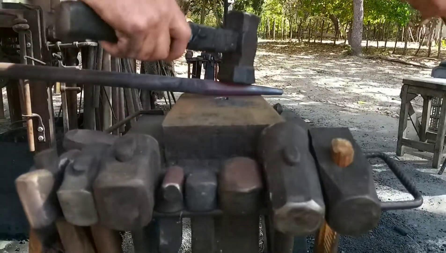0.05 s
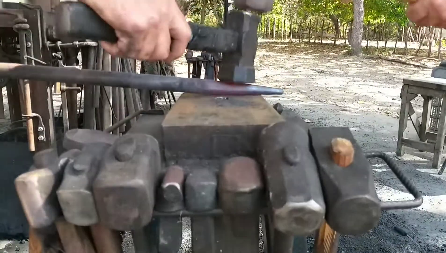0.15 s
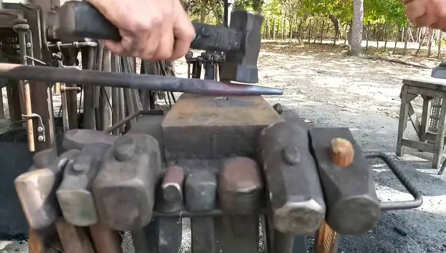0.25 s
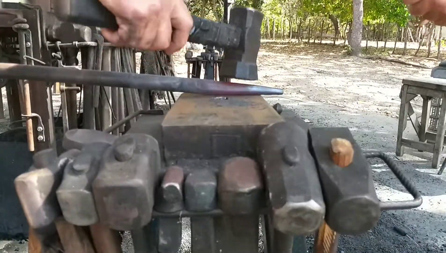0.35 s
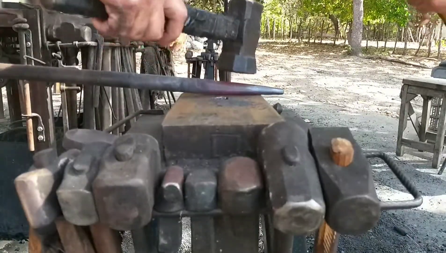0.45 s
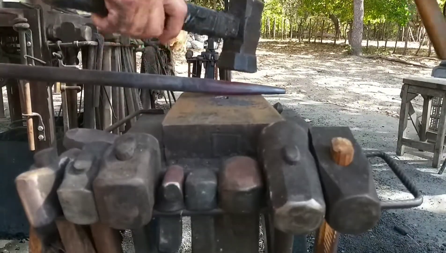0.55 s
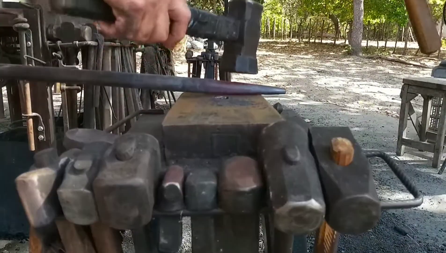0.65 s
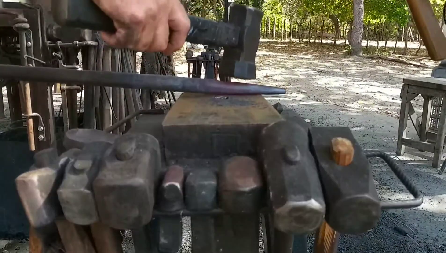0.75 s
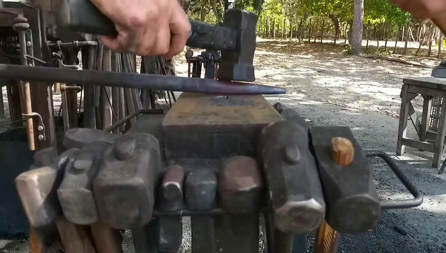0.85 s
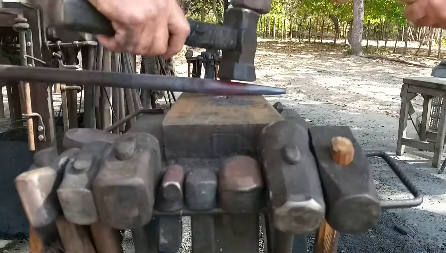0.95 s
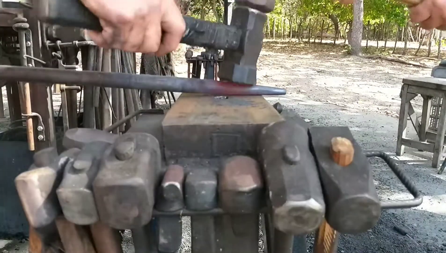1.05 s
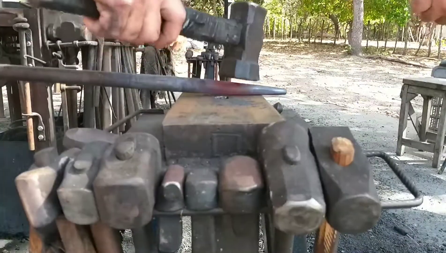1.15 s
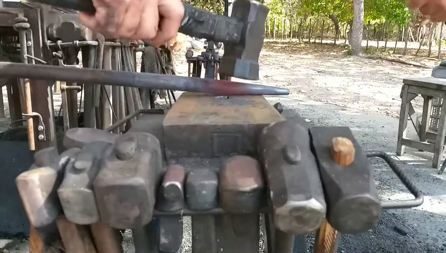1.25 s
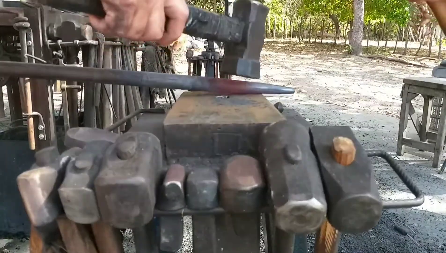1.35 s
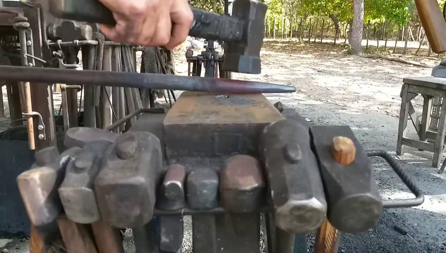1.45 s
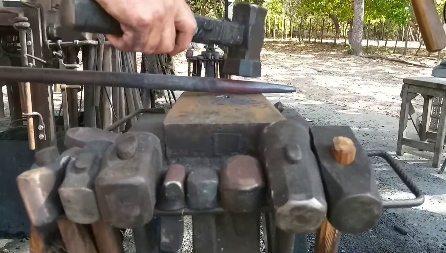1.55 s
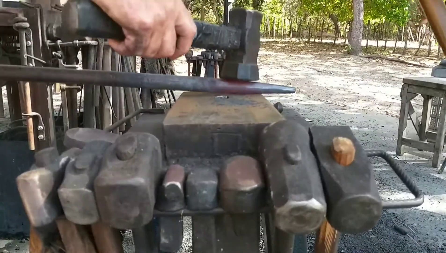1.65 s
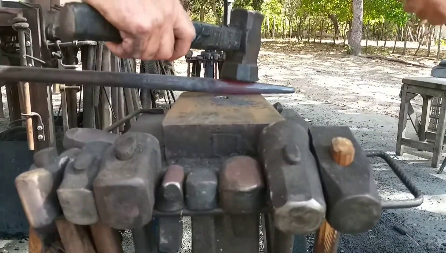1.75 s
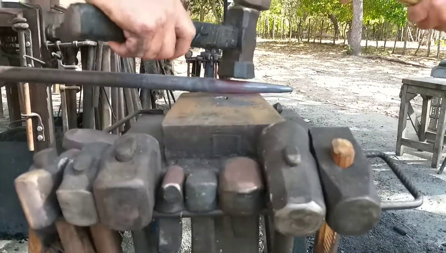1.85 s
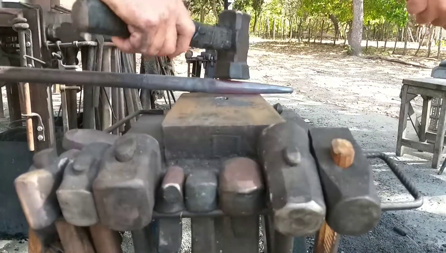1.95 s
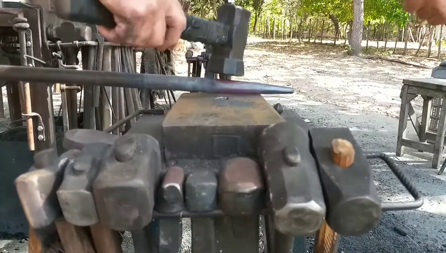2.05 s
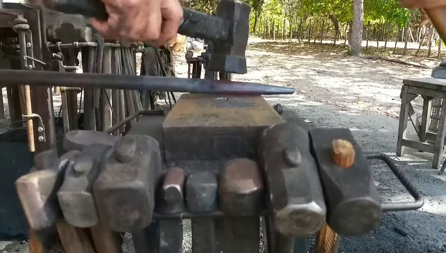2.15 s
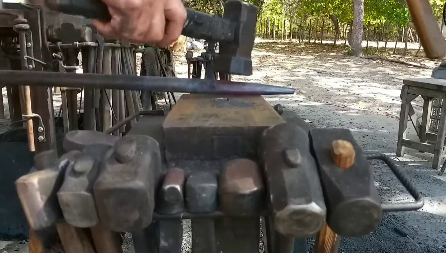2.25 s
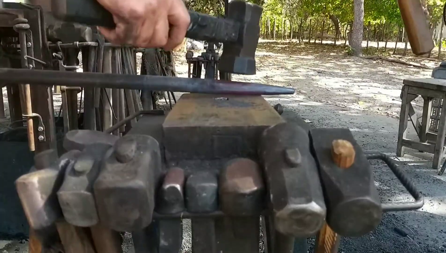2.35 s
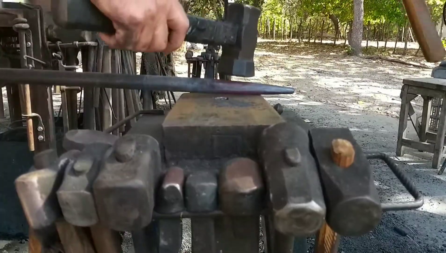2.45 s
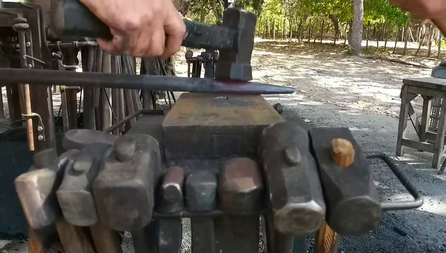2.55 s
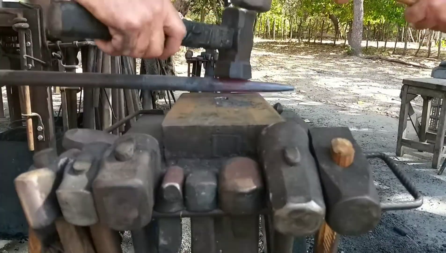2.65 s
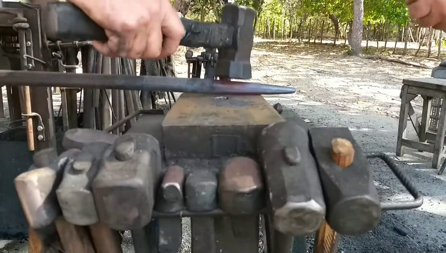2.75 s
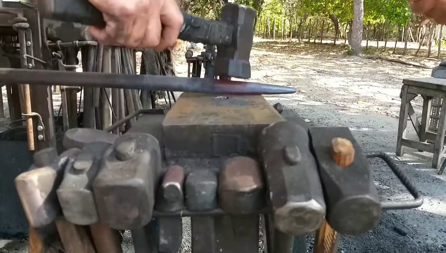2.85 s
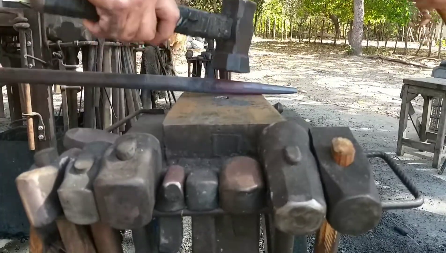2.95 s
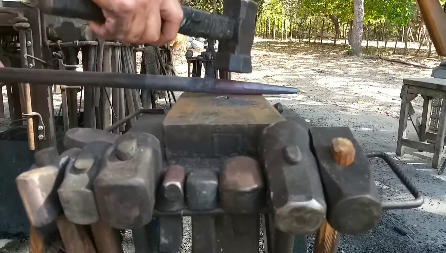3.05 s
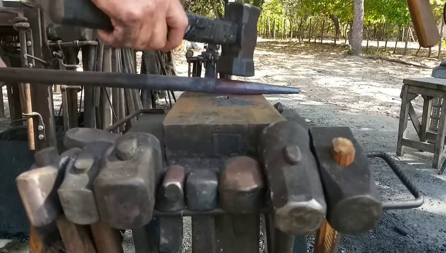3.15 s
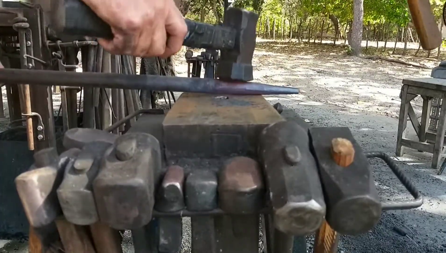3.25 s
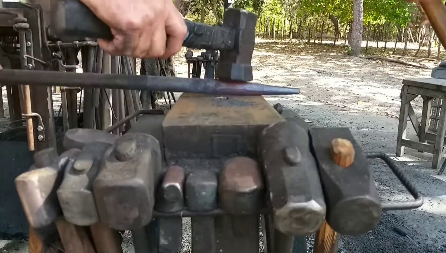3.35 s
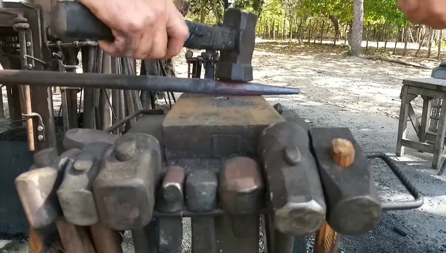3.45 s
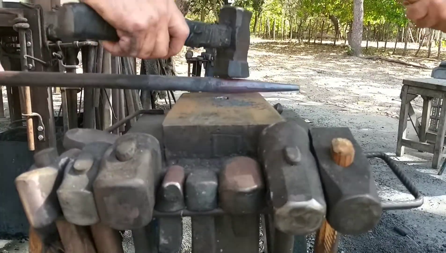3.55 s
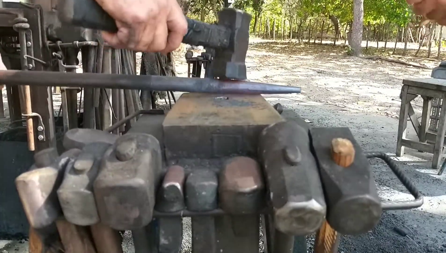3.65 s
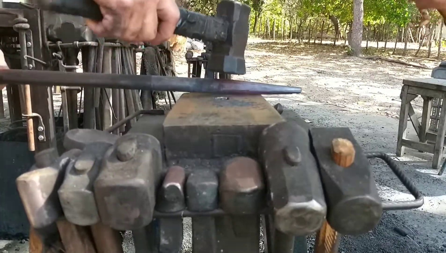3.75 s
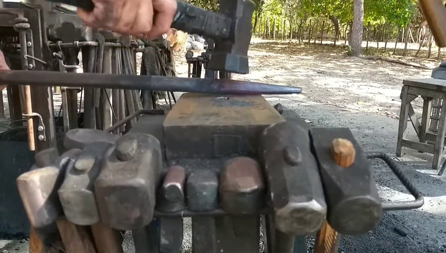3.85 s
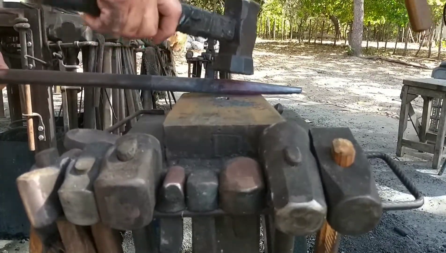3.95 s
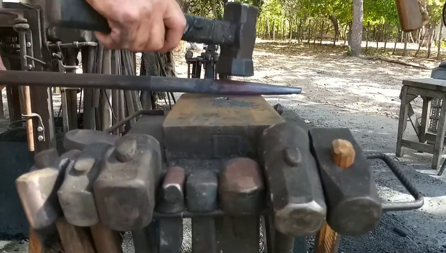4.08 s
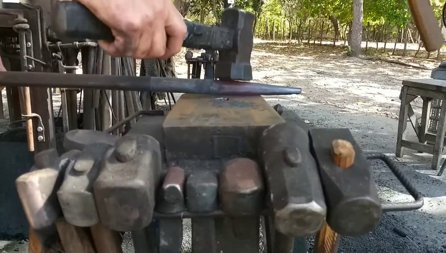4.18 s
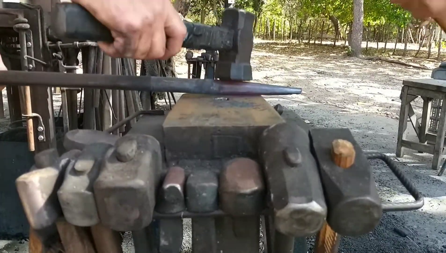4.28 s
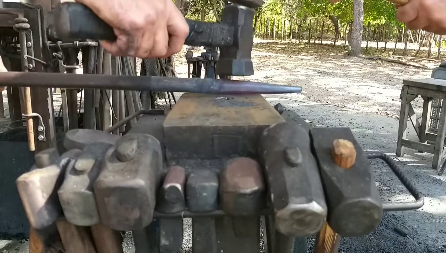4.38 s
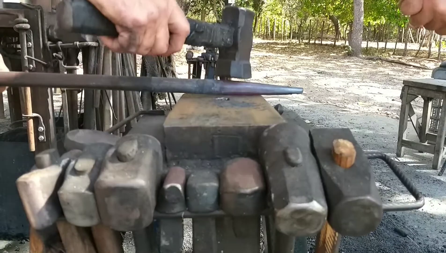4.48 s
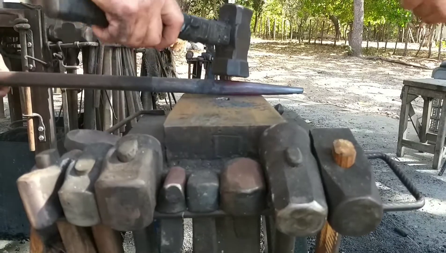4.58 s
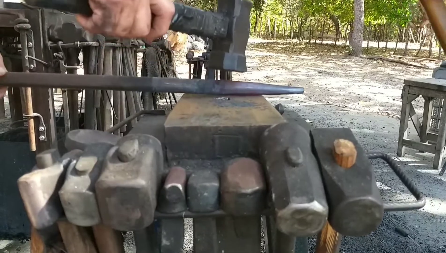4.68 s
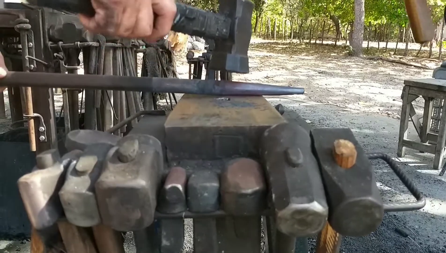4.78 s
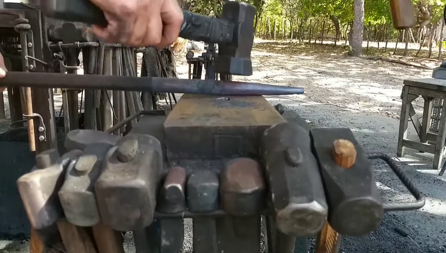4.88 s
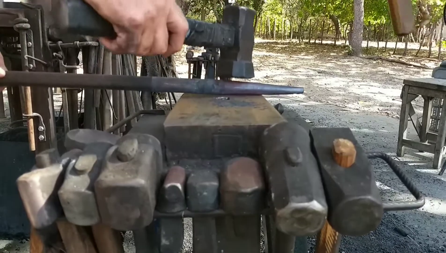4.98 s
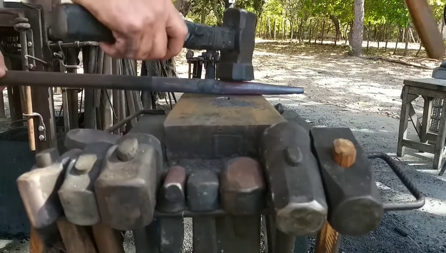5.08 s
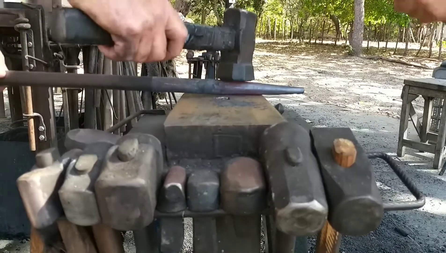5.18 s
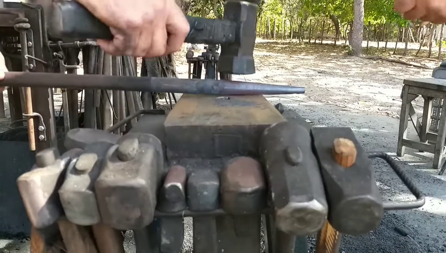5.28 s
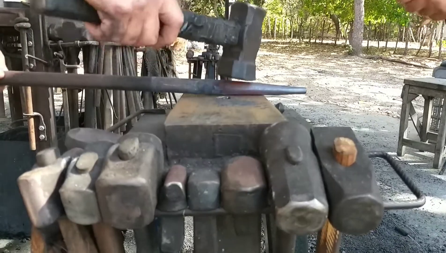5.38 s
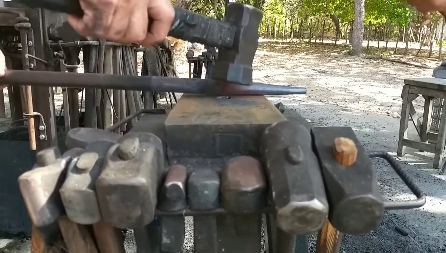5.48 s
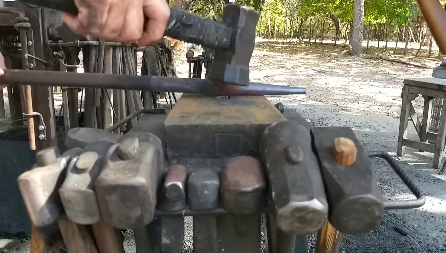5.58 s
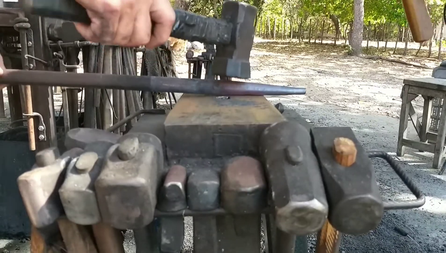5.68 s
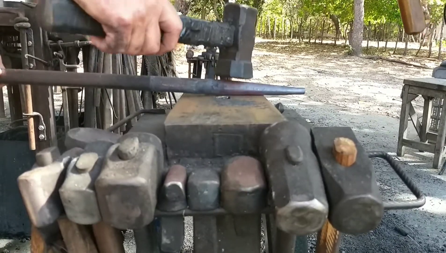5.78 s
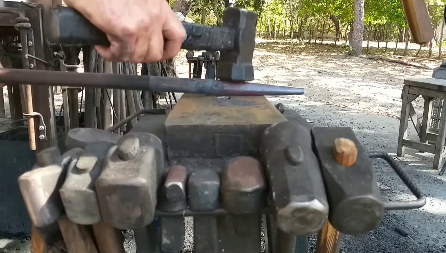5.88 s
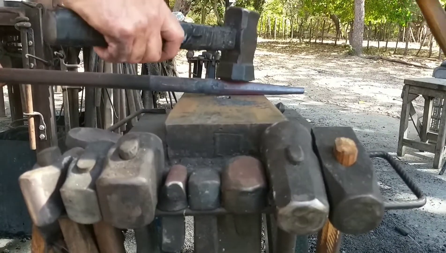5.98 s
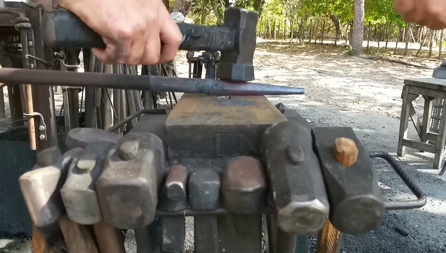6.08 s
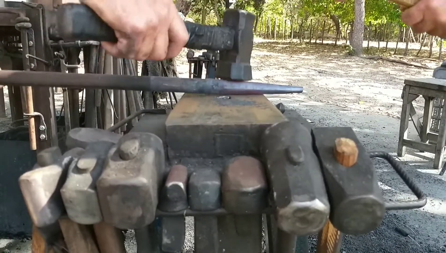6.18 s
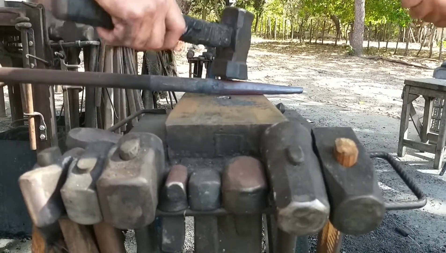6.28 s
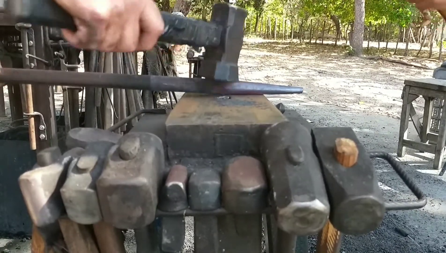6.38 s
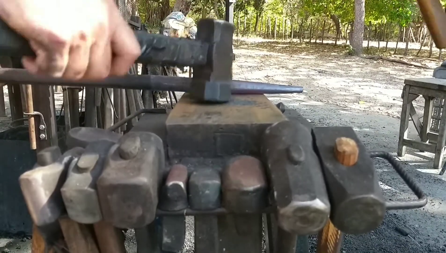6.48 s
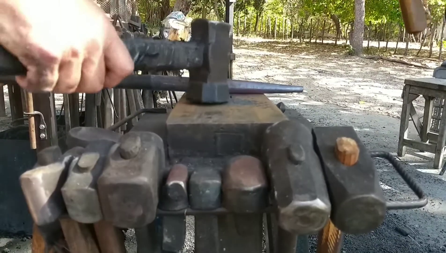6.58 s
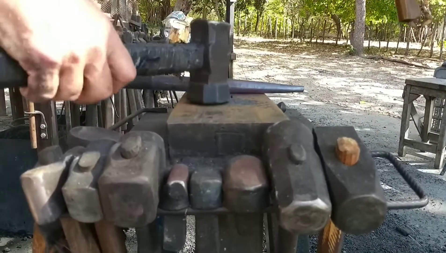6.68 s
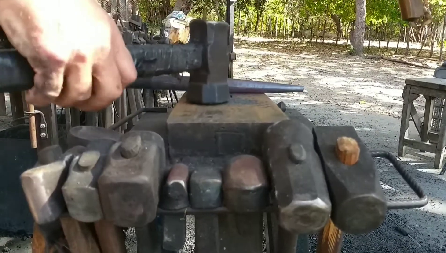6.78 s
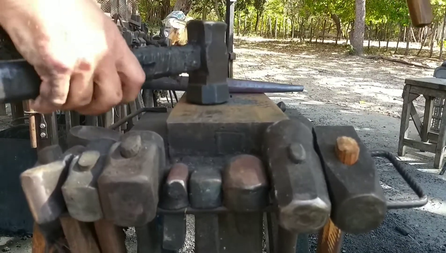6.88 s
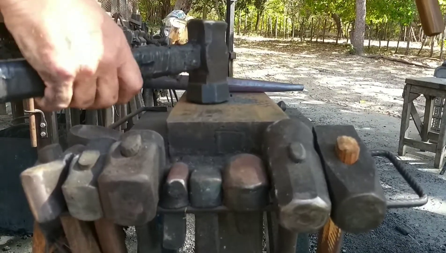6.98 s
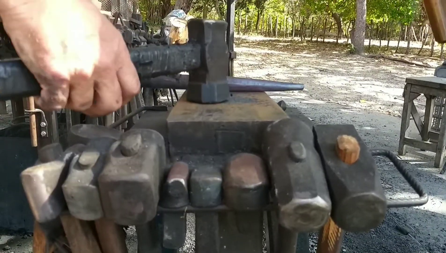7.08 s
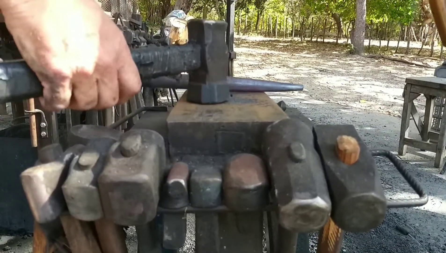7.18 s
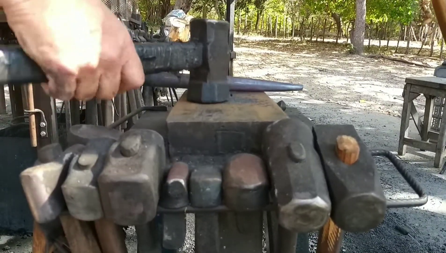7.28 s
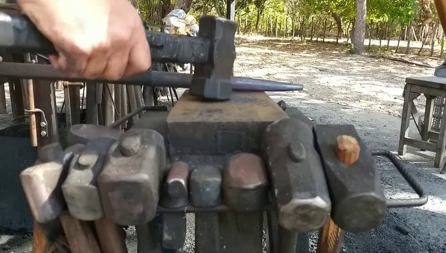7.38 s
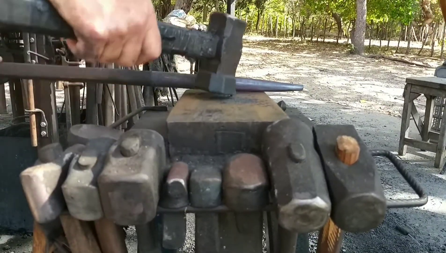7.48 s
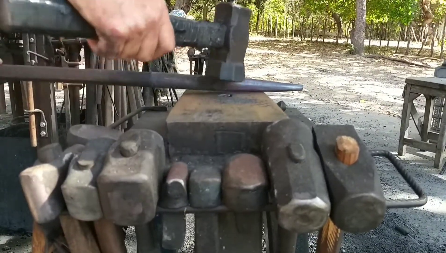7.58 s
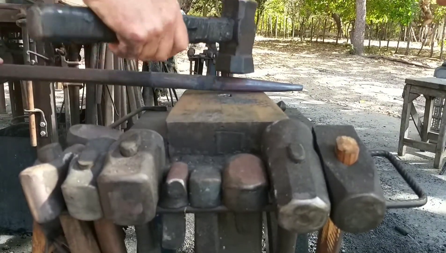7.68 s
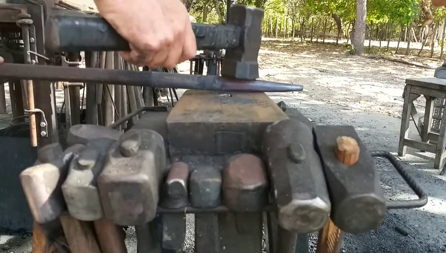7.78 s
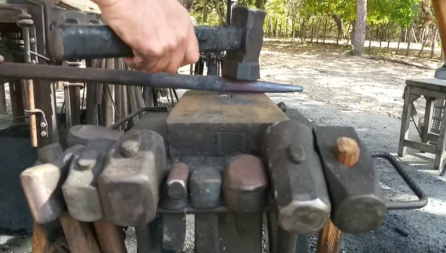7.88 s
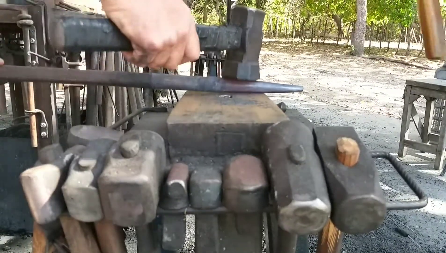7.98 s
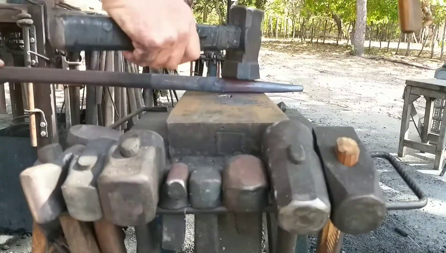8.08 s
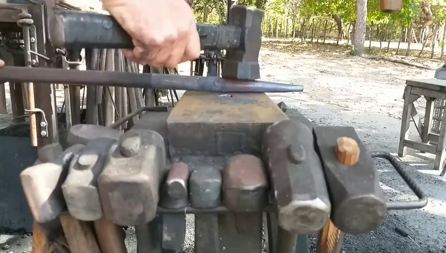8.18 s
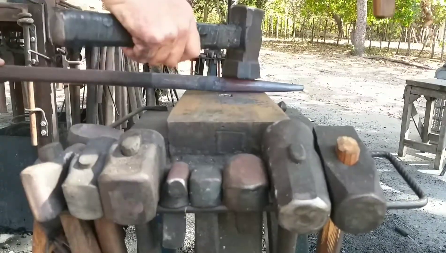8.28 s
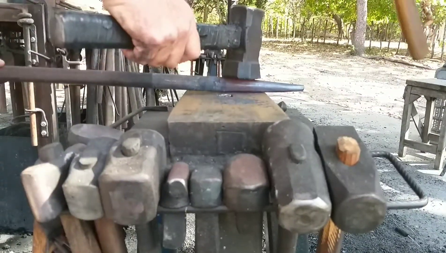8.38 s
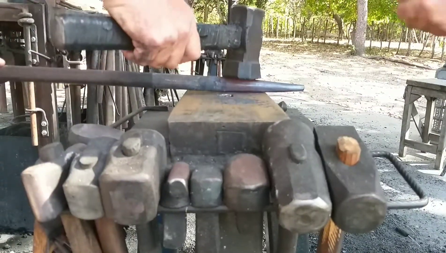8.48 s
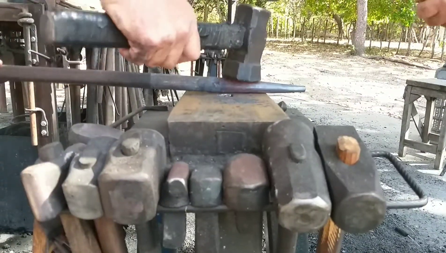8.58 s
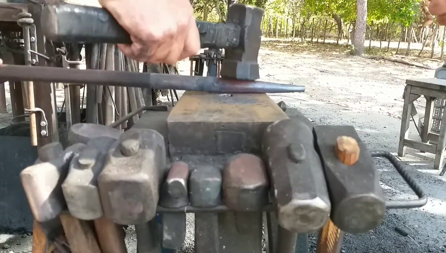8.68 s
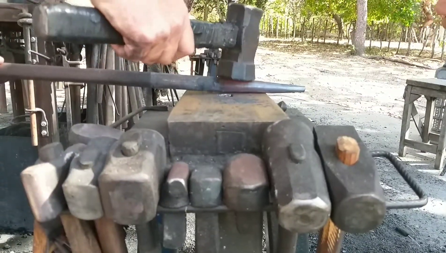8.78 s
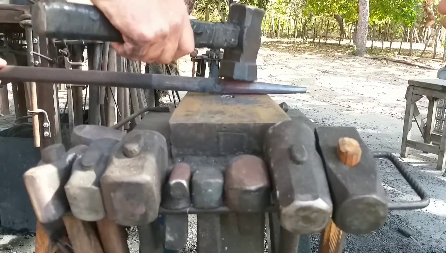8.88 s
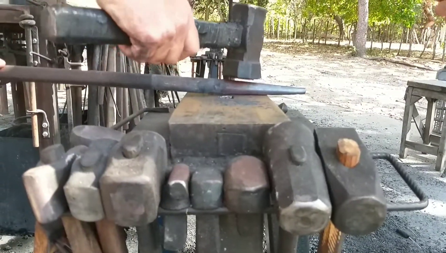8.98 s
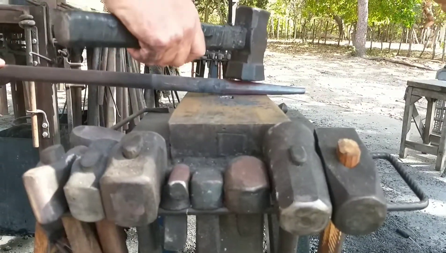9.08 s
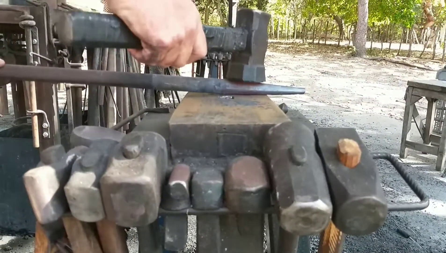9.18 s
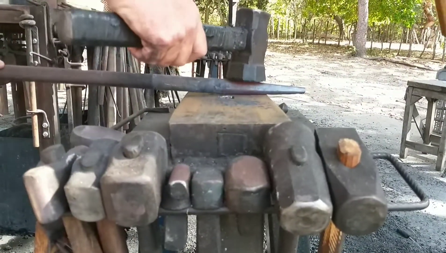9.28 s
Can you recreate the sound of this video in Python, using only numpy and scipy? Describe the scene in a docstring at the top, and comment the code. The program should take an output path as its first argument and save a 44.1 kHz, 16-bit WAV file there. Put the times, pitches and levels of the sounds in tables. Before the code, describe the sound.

A close outdoor anvil, nearly centred, with quiet airy hiss and a very faint hum behind it. A sledge slams a steel tool onto a bar at about 0.1, 0.9, 1.8, 2.6, 3.5, 4.3, 5.2 and 6.1 seconds. Every blow is a hard, softly overloaded crack and bright crash over a short thud, with clustered high steel ringing around 3 to 5 kHz, a thin lingering 8 kHz tone and a short yard wash. The tool immediately bounces and chatters; small choked clinks come between blows, busier near 3.6 and clearer at 5.3. Tiny scale ticks appear around 3. The beat stops after 6.1: a clink at 6.45, then a triple clink near 7.8. Wind rumble and hiss swell from about 7, with a buffet and tick near 8.1. A final blow at 8.5 crashes longest, followed by fading wind and faint clinks to about 9.1.

```python
"""Two smiths at an anvil

In an open yard a top tool is set on a hot steel bar with a light clink and a sledge hits it: noise bursts make
crack, crash and yard wash, and beating decaying modes make the ringing bar and the singing steel heads.
The tool falls back and rattles, scale ticks, and a gust of coloured noise brushes the microphone near the end.
The microphone overloads softly and the recorder's limiter flattens every blow."""
import sys
import numpy as np
from scipy import signal
from scipy.fft import rfft, irfft, next_fast_len
from scipy.io import wavfile
from scipy.ndimage import uniform_filter1d, minimum_filter1d

SR = 44100
rng = np.random.default_rng(int(sys.argv[2]) if len(sys.argv) > 2 else 0)


def wav_out(sig):
    """Save sig, one row per channel (or a flat mono array), as 16-bit PCM at SR to the path in sys.argv[1]."""
    wavfile.write(sys.argv[1], SR, np.round(np.clip(np.atleast_2d(sig).T, -1, 1) * 32767).astype(np.int16))


N = 411894

# Sledge on the top tool; where the bar is pinched decides how far its main and upper modes stand out:
# (t/s, impact reference level/dB, crash t60/s, bar ring reference level/dB, main mode boost/dB,
#  upper mode boost/dB, long ring level/dB, rebound delay/s)
BLOWS = [(0.141, -20.5, 0.17, -37, -3, 1, -42, .009), (0.929, -22.5, 0.17, -38, 3, -3.5, -38, .033),
         (1.802, -24.5, 0.2, -33, -5.5, -2, -42, .023), (2.628, -21, 0.17, -26, 5, -3, -47, .009),
         (3.471, -22.5, 0.15, -30, 2, 6, -41.5, .022), (4.345, -24.5, 0.23, -34, -1.5, 3, -47.5, .022),
         (5.216, -22, 0.19, -28, -5, -8, -47, .014), (6.094, -21.5, 0.21, -35, 3, -4, -49.5, .025),
         (8.482, -20, 0.34, -27.5, 5, -1.5, -51, .03)]
# Colour of a blow's crash: (f/Hz, relative level/dB)
CRASH = [(30, -40), (80, -1.5), (220, 1.5), (450, -1), (900, -2.5), (1500, 1.5), (2500, -1.5), (3800, 5),
         (5500, -2.5), (8500, -6), (11000, -8), (15500, -6.5)]
# Colour of the impacts' wash around the yard: (f/Hz, relative level/dB)
YARD = [(50, -28), (200, 10), (500, -4.5), (1000, -10.5), (2200, 0.5), (3800, 7.5), (5500, -8.5),
        (9000, -5.5), (14000, -31)]
# Stereo width of the impacts and their wash: (f/Hz, side minus mid level/dB)
WIDTH = [(60, -42), (200, -41), (500, -40), (1300, -21.5), (2400, -17.5), (4400, -24), (8000, -10.5),
         (14000, -4.5)]
# Stereo width of wind and open air: (f/Hz, side minus mid level/dB)
AIR_WIDTH = [(60, -38), (150, -55), (400, -34), (1300, -24), (4400, -18.5), (8000, -2.5), (15000, -8.5)]
MAIN_HZ, UPPER_HZ = 3655, 4762   # the two bar modes that the place of contact favours


def from_db(db):
    """Decibels to gain."""
    return 10 ** (np.asarray(db) / 20)


def rms_one(x):
    """Scale to unit rms."""
    return x / np.sqrt(np.mean(x ** 2) + 1e-20)


def at_hz(points, hz):
    """Read a spectrum on a log-frequency axis."""
    points_hz, points_db = np.array(points).T
    return np.interp(np.log(hz + 1e-9), np.log(points_hz), points_db)


def add(track, s, sound):
    """Mix a sound into a track at a time in seconds."""
    i = int(s * SR)
    track[..., i:i + sound.shape[-1]] += sound[..., :N - i]


def fade(t60):
    """An exponential decay from 1, falling 60 dB in t60 seconds."""
    return from_db(-60 * np.arange(int(1.3 * t60 * SR) + 2) / (t60 * SR))


def bursts(rows):
    """Envelope of sudden bursts, summed as power, from rows of (t/s, level/dB, t60/s)."""
    power = np.zeros(N)
    for s, db, t60 in rows:
        add(power, s, (from_db(db) * fade(t60)) ** 2)
    return np.sqrt(power)


def noise(spectrum, width=WIDTH):
    """Stereo noise of a given colour and width, built as mid and side; rms 1."""
    size = next_fast_len(N)
    hz = np.arange(size // 2 + 1) * SR / size
    mid, side = rfft(rng.standard_normal((2, size))) * from_db(at_hz(spectrum, hz))
    side = side * from_db(at_hz(width, hz))
    return rms_one(irfft([mid + side, mid - side], size)[:, :N])


def drift(rate):
    """Straight lines between random knots of spread 1, `rate` knots a second; holds the last knot if they run out."""
    knots = rng.standard_normal(N // 100)
    return np.interp(np.arange(N) / SR * rate, np.arange(len(knots)), knots)


def mode(hz, t60, push, split_hz, twin_db, side_db, bend_hz=0, settle_s=0.0267):
    """A close pair of modes, beating, rung by a train of pushes; a little out of phase at the two microphone ports."""
    pole = from_db(-60 / (t60 * SR)) * np.exp(2j * np.pi * hz / SR)
    swing = signal.lfilter([1], [1, -pole], np.pad(push, (0, len(fade(t60)))))
    swing = swing / np.abs(swing).max()
    t = np.arange(len(swing)) / SR
    beat = split_hz * rng.uniform(0.62, 1.495) * t + rng.random()
    twin = from_db(twin_db) * np.exp(2j * np.pi * beat)
    bend = bend_hz * settle_s * np.exp(-t / settle_s)   # the pitch slides home as the contact pressure eases
    swing = swing * (1 + twin) * np.exp(2j * np.pi * bend)
    lead = np.arctan(from_db(at_hz(WIDTH, hz) + side_db)) * rng.choice([-1, 1])
    return np.imag(swing * np.exp(1j * lead * np.array([[1], [-1]])))


def background():
    """Quiet outdoor air as slowly swelling noise; noise through resonators adds a faint wavering hum and high hiss."""
    # Colour of the open air: (f/Hz, relative level/dB)
    air_colour = [(18, -60), (30, -35), (118, -4), (404, -12), (449, -18.5), (584, -11.5), (649, -17.5),
                  (780, -14.5), (844, -18.5), (1040, -16), (2480, -16.5), (3870, -11), (5040, -20),
                  (8300, -17), (16000, -35.5)]
    # Narrow noise bands: (f/Hz, width/Hz, level/dB)
    hum_bands = [(170.7, 8.3, -80), (588, 51, -84), (3755, 290, -73.5)]
    swell = from_db(1.4 * drift(rate=4.8))
    out = from_db(-70.5) * noise(air_colour, AIR_WIDTH) * swell
    for hz, width_hz, db in hum_bands:
        b, a = signal.iirpeak(hz, hz / width_hz, fs=SR)
        out = out + from_db(db) * rms_one(signal.lfilter(b, a, rng.standard_normal(N)))
    return out


def rattle(length_s, count=12):
    """A flurry of uneven contacts as the faces settle on each other."""
    push, when = np.zeros(int(length_s * SR) + 2), rng.random(count)
    push[(when * (len(push) - 1)).astype(int)] = rng.uniform(0.21, 1, count)
    push[0] = 0.69
    return push


def bar_ring(db, tilt_db, main_db, upper_db, rattle_s, damping, detune, scatter_db=5.0):
    """One second of bar ring; the place of contact weights the modes, each pitch is scattered a little on its own."""
    # Bending modes of the bar, one list per column:
    # (f/Hz before detuning), (relative level/dB), (t60/s before division by damping)
    bar_hz = [1182, 1874, 2720, 3657, 4762, 5956, 7256, 8638, 10154, 11708, 13320, 15100]
    bar_db = [-22.5, -6.5, -14.5, 2.5, -7.5, -13.5, -14.5, -13.5, -13, -27, -23, -35]
    bar_t60 = [0.29, 0.21, 0.24, 0.13, 0.17, 0.17, 0.19, 0.18, 0.13, 0.24, 0.043, 0.073]
    out, push = np.zeros((2, SR)), rattle(rattle_s)
    for hz, mode_db, t60 in zip(bar_hz, bar_db, bar_t60):
        # within a tenth of an octave
        is_main, is_upper = np.abs(np.log2(hz / np.array([MAIN_HZ, UPPER_HZ]))) < 1 / 10
        level_db = db + mode_db + tilt_db * np.log2(hz / MAIN_HZ)   # tilt is per octave
        level_db = level_db + main_db * is_main + upper_db * is_upper
        ring = mode(hz + detune * rng.normal(), t60 / damping, push, split_hz=24.0,
                    twin_db=-14 if is_main else -6, side_db=-10 if is_main else 0,
                    bend_hz=30 * rng.normal())
        level_db = level_db + scatter_db * (not is_main) * rng.normal()
        add(out, 0, from_db(level_db) * ring[:, :SR])
    return out


def clang(count=110, t60=0.088, level_db=-21):
    """The tools hung around the anvil answer every blow with a crowd of weak, short modes."""
    out, decay = np.zeros((2, N)), fade(t60)
    hz = np.geomspace(700, 15000, count) * rng.uniform(0.94, 1.015, count)
    swings = np.exp(2j * np.pi * np.outer(hz, np.arange(len(decay))) / SR) * decay
    sizes = from_db(at_hz(CRASH, hz) + level_db) * np.sqrt(hz / MAIN_HZ)
    for s, crash_db, *rest in BLOWS:
        phases = np.exp(2j * np.pi * rng.random((2, count)))
        mid, side = rng.standard_normal((2, count)) * phases * sizes
        side = side * from_db(at_hz(WIDTH, hz))
        add(out, s, from_db(crash_db) * np.imag(np.array([mid + side, mid - side]) @ swings))
    return out


def sledge():
    """Each blow: noise bursts for crack, crash, anvil thud and yard wash, over decaying modes of ringing steel."""
    # Dull thud of the anvil on its stand: (f/Hz, relative level/dB)
    thud_colour = [(25, -21), (65, 1.5), (150, -4), (220, 0.5), (320, -5.5), (600, -1.5), (1000, -7.5),
                   (1450, 1), (2600, -9), (6000, -44)]
    # Modes of hammer heads and anvil, one list per column: (f/Hz before detuning), (relative level/dB), (t60/s)
    head_hz = [1508, 2218, 2947, 4174, 4504, 6503, 6926, 12068, 13011, 13797]
    head_db = [8, 1, 16, -1.5, -6, 0.5, 3, 3, -4.5, -5]
    head_t60 = [0.06, 0.16, 0.059, 0.26, 0.3, 0.2, 0.1, 0.31, 0.16, 0.16]
    long_ring_hz, long_ring_t60 = 7985, 0.75   # the sledge head sings on as it is lifted
    thud_db, head_ring_db = -8.5, -19   # relative to the impact reference level
    brightness_db_per_octave = 4.5
    rings = clang()
    for s, crash_db, crash_t60, bar_db, main_db, upper_db, long_db, rebound_s in BLOWS:
        bar = bar_ring(bar_db, brightness_db_per_octave, main_db, upper_db,
                       rattle_s=.025, damping=0.63, detune=6.4)
        add(rings, s, bar)
        long_ring = mode(long_ring_hz, long_ring_t60, [1.], split_hz=11.3, twin_db=-9.5, side_db=-26)
        add(rings, s, from_db(long_db) * long_ring)
        for hz, mode_db, t60 in zip(head_hz, head_db, head_t60):
            level_db = crash_db + head_ring_db + mode_db + 2.8 * rng.normal()
            head = mode(hz + 7 * rng.normal(), t60, [1.], split_hz=15.2, twin_db=-4, side_db=-15.0)
            add(rings, s, from_db(level_db) * head)
    crack = bursts([(s, db + 4.0, .03) for s, db, *rest in BLOWS])
    grit = from_db(3.0 * drift(rate=590))   # knots run out after about 7 s: any later crash is smooth
    crash = bursts([(s, db - 7.5, t60) for s, db, t60, *rest in BLOWS]) * grit
    thud = bursts([(s + 0.0036, db + thud_db, .12) for s, db, *rest in BLOWS])
    wash = bursts([(s + 0.03, db - 27, .6) for s, db, *rest in BLOWS])
    return rings + (crack + crash) * noise(CRASH) + thud * noise(thud_colour) + wash * noise(YARD)


def rebounds(count=2):
    """After a blow the top tool jumps, falls back on the bar and chatters once more, weaker; rows for touches()."""
    rebound_db, rebound_main_db = -1, 4.5   # relative to the blow's bar ring and main mode boost
    chatter_gap_s, chatter_loss_db, free_s = .045, 10, 0.037   # the gap is varied below
    rows = []
    for s, crash_db, crash_t60, bar_db, main_db, upper_db, long_db, rebound_s in BLOWS:
        gap_s = chatter_gap_s * rng.uniform(.8, 1.3)
        for k in range(count):
            fall_db = bar_db + rebound_db - k * chatter_loss_db
            fall_main_db = main_db + rebound_main_db * (k == 0)
            rows.append((s + rebound_s + k * gap_s, fall_db, fall_main_db, upper_db, free_s))
    return rows


def touches(rows, rattle_s, clack_db, choke_db_per_s=600, soft_s=0.0041):
    """Set-downs and rebounds: a clack, then the bar rings freely until the tool settles on it and chokes it."""
    # Clack of a light touch: (f/Hz, relative level/dB)
    clack_colour = [(30, -17), (120, -0.5), (500, -6.5), (1100, -7), (2000, 7.5), (3800, 4.5), (5500, -19),
                    (10000, -32), (15000, -38)]
    firm_db = -41   # a contact this strong rings the modes in their plain balance
    brightening = 0.21   # dB per octave for each dB above that: a harder contact is brighter
    rings, t = np.zeros((2, N)), np.arange(SR) / SR
    for s, db, main_db, upper_db, free_s in rows:
        choke = from_db(-choke_db_per_s * np.maximum(t - free_s, 0))
        soft_onset = np.minimum(t / soft_s, 1)
        ring = bar_ring(db, brightening * (db - firm_db), main_db, upper_db,
                        rattle_s, damping=0.86, detune=16.0)
        add(rings, s, choke * soft_onset * ring)
    clacks = bursts([(s, db + clack_db, .07) for s, db, *rest in rows])
    clacks = uniform_filter1d(clacks, int(soft_s * SR) + 1)   # soften the attack
    wash = bursts([(s + 0.014, db + clack_db - 15.5, .18) for s, db, *rest in rows])
    return rings + clacks * noise(clack_colour) + wash * noise(YARD)


def flakes():
    """Flakes of scale snapping off the bar: tiny bright ticks of noise."""
    # Each tick: (t/s, level/dB)
    ticks = [(2.874, -54), (3.101, -58), (3.124, -60), (7.355, -58), (8.083, -40)]
    return bursts([(s, db, .03) for s, db in ticks]) * noise([(2500, -8), (7000, 2), (15000, -5.5)])


def wind():
    """One gust swells, holds and dies away: lumpy rumble on the microphone, single eddies, and hiss that swells too."""
    # The strongest eddies on the microphone: (t/s, peak level/dB)
    eddy_peaks = [(5.722, -61.5), (6.001, -60.5), (7.626, -54), (8.077, -45), (8.217, -55.5)]
    # Colour of rumble and eddies: (f/Hz, relative level/dB)
    rumble_colour = [(18, -50), (30, -27), (103, 2), (245, -1.5), (420, -11), (506, -17.5), (581, -9.5),
                     (854, -38), (1200, -41), (1560, -61), (2640, -120)]
    # Colour of the hiss: (f/Hz, relative level/dB)
    hiss_colour = [(410, -23), (700, -11), (863, -13.5), (1660, -10), (2530, -13), (3840, 1), (5060, -14),
                   (8650, -12), (15000, -30), (16000, -31)]
    full_s, hold_s, rise_db_per_s, fall_db_per_s = 7.687, 0.7, 37.5, 29
    hiss_db, rumble_db = -57.5, -60   # at full gust, about which they flutter and lump
    rumble_follows = 0.69   # the rumble's share of the gust's swing in dB
    clock = np.arange(N) / SR
    t = clock - full_s
    gust_db = -rise_db_per_s * np.maximum(-t, 0) - fall_db_per_s * np.maximum(t - hold_s, 0)
    lumps = from_db(3.8 * drift(rate=51))
    rumble = from_db(rumble_db + rumble_follows * gust_db) * lumps
    eddies = sum(from_db(db) / (1 + ((clock - at) / 0.011) ** 2) for at, db in eddy_peaks)
    flutter = from_db(.9 * drift(rate=40))
    hiss = from_db(hiss_db + gust_db) * flutter
    return (rumble + eddies) * noise(rumble_colour, AIR_WIDTH) + hiss * noise(hiss_colour, AIR_WIDTH)


def scene():
    """Everything heard at the anvil."""
    # Top tool and bar touching the anvil, set down before a blow or settling after it:
    # (t/s, ring reference level/dB, main mode boost/dB, upper mode boost/dB, free ringing/s)
    contacts = [(.258, -48, 8.5, 7, 0.058), (.796, -54, 7, 6, 0.018), (1.583, -51, 7, 6, 0.025),
                (1.605, -56, 15.5, 4, .05), (1.897, -44, 4.5, -4, 0.0033), (2.509, -52, 15.5, 3, 0.026),
                (2.762, -42.5, 10, 2, 0.024), (3.227, -51.5, -5, 0, 0.069), (3.564, -45, 2, -6, .01),
                (3.587, -40.5, 11, -11, .004), (3.616, -38, 0, 12.5, 0.11), (4.162, -54.5, 7, 0, 0.081),
                (4.5, -47, 5, 1, 0.064), (5.013, -49.5, 1.5, 13, 0.042), (5.068, -62, 4, 8, 0.037),
                (5.266, -32.5, -22, 11.5, .1), (5.802, -50, 7, -8, 0.052), (6.445, -36, -7, -8, 0.0013),
                (6.457, -56, 7, -6, 0.1), (7.765, -34, 11, 0, 0.02), (7.786, -36.5, 12.5, 2.5, 0.076),
                (7.808, -33, 8, 5, 0.008), (8.705, -53.5, -14, -11, 0.053), (9.103, -49.5, 9.5, -6, 0.041)]
    # clack_db: knock of a contact relative to its ring reference level
    top_tool = touches(rebounds(), rattle_s=.02, clack_db=-.5)
    top_tool = top_tool + touches(contacts, rattle_s=.007, clack_db=-1.5)
    return background() + sledge() + top_tool + flakes() + wind()


def limiter(x, ceiling_db, release_db_per_s):
    """The gain drops just ahead of each peak and recovers at a steady rate."""
    over = np.maximum(20 * np.log10(np.abs(x).max(axis=0) + 1e-9) - ceiling_db, 0)
    ramp = release_db_per_s * np.arange(N) / SR
    gain_db = ramp - np.maximum.accumulate(over + ramp)
    early_db = minimum_filter1d(gain_db, size=32)
    return x * from_db(uniform_filter1d(early_db, size=32))


def record(dry, overload_db=-9.5):
    """The microphone overloads on the crack of a blow, a limiter holds the rest down; the top is cut."""
    top = from_db(overload_db)
    overloaded = top * np.tanh(dry / top)
    held = limiter(overloaded, ceiling_db=-22.5, release_db_per_s=287)
    low_pass = signal.ellip(10, .1, 80, 15900, fs=SR, output="sos")   # 15.9 kHz cutoff
    return signal.sosfilt(low_pass, held)


dry = scene()
out = record(dry)
wav_out(out)
```